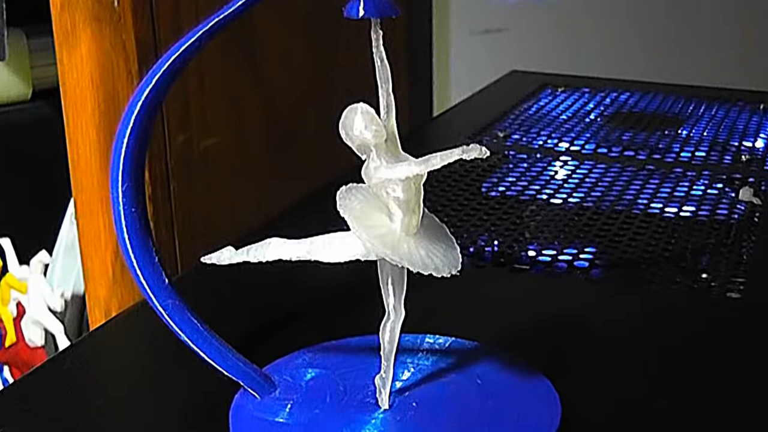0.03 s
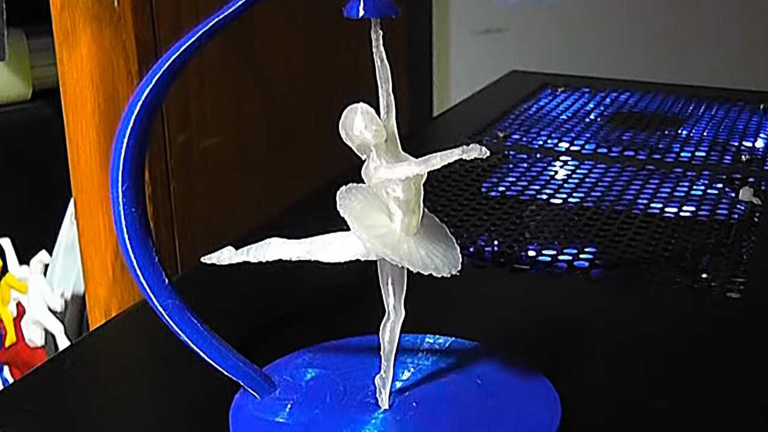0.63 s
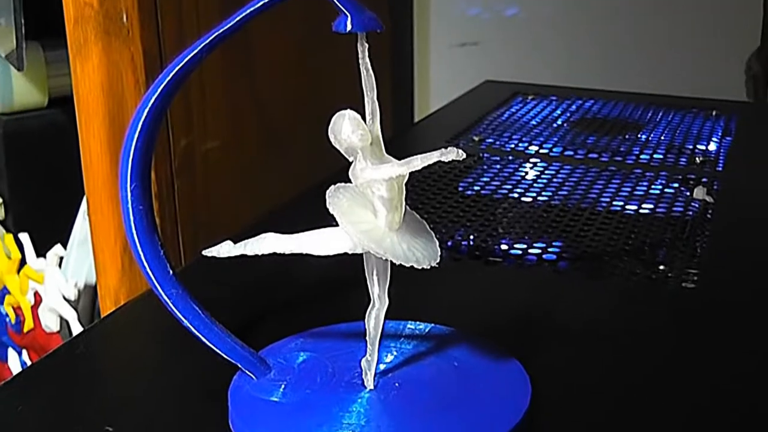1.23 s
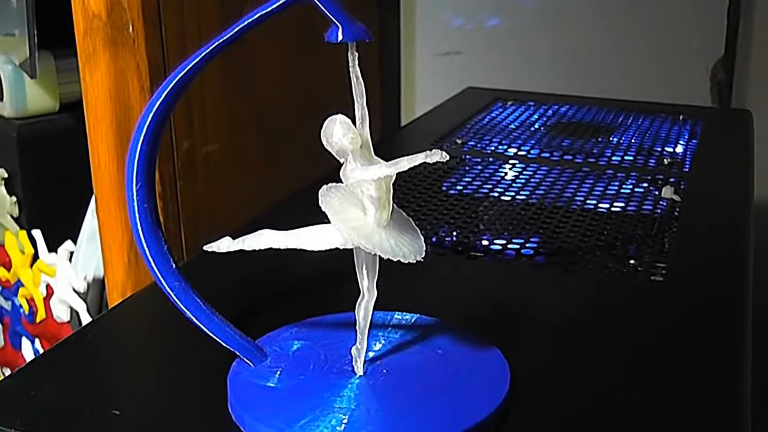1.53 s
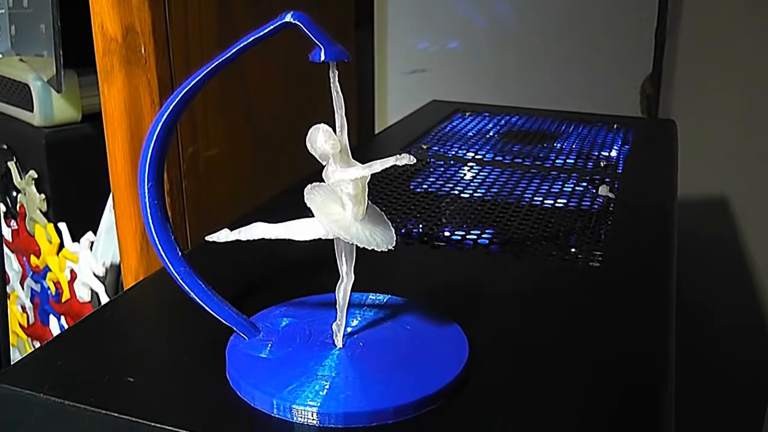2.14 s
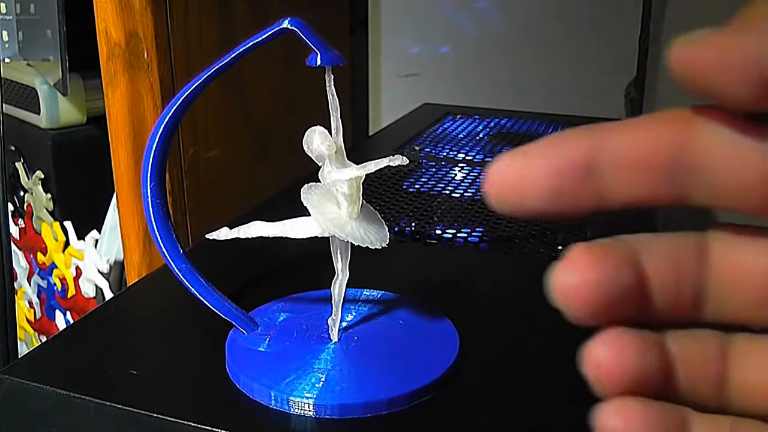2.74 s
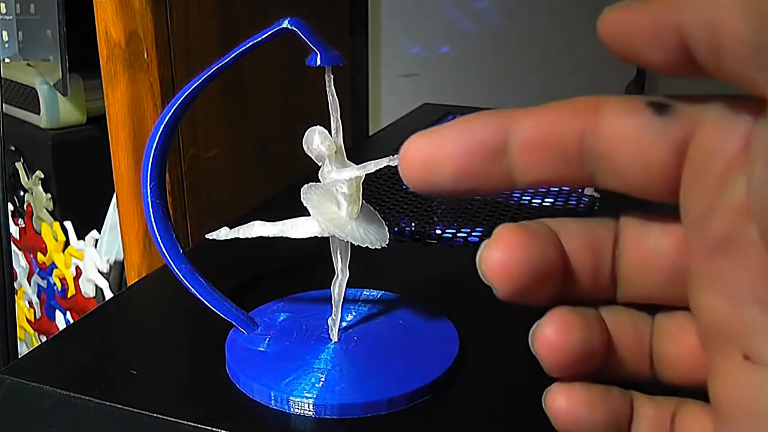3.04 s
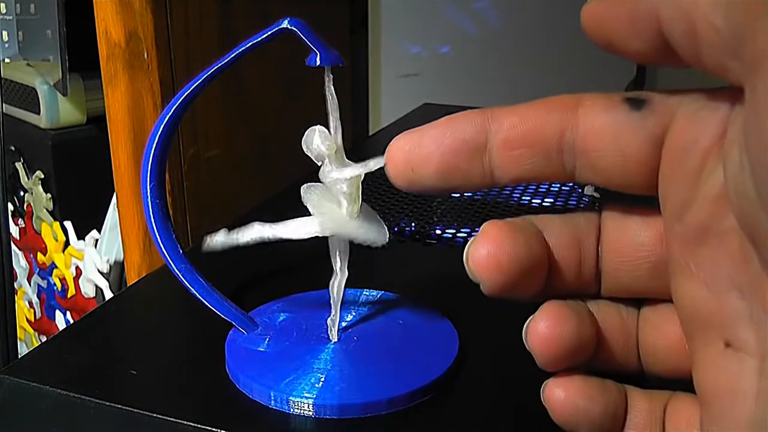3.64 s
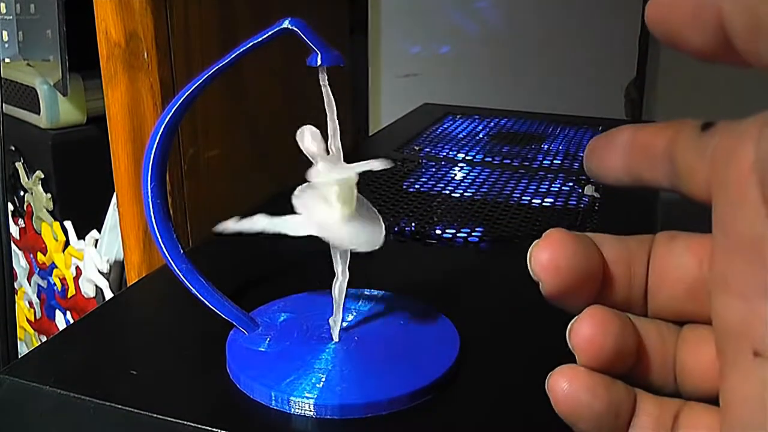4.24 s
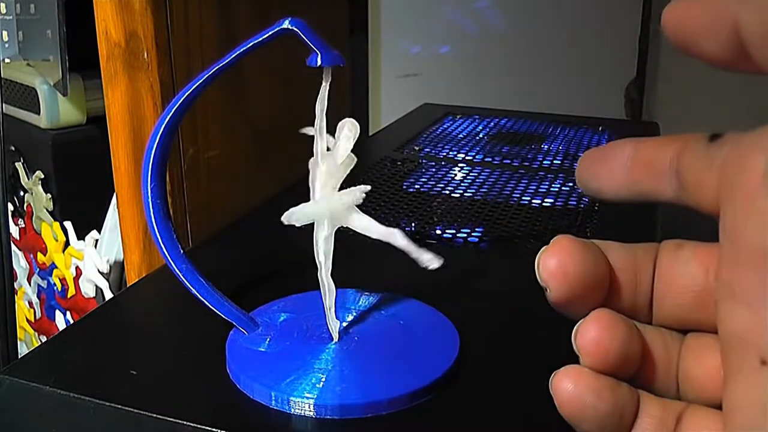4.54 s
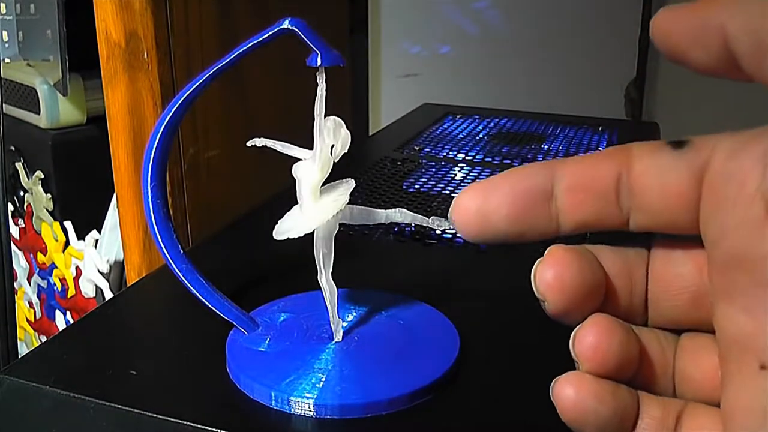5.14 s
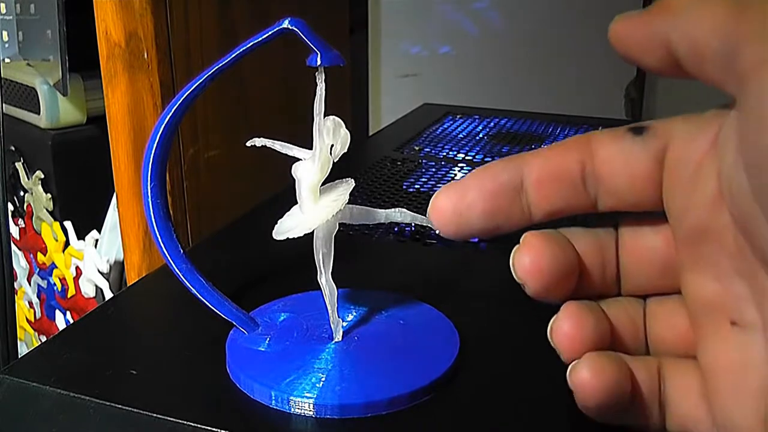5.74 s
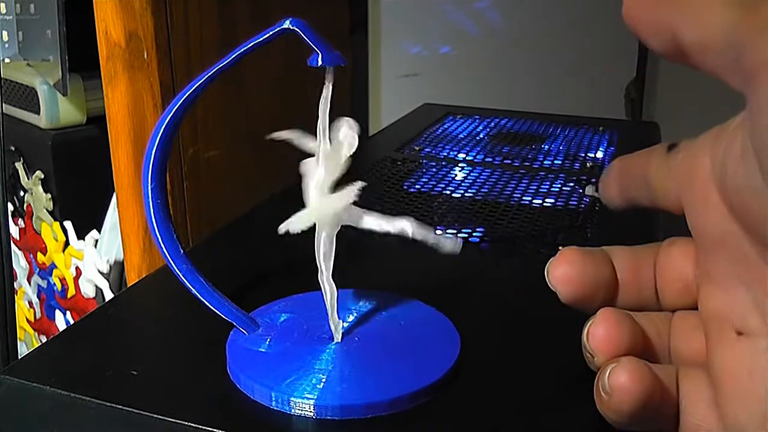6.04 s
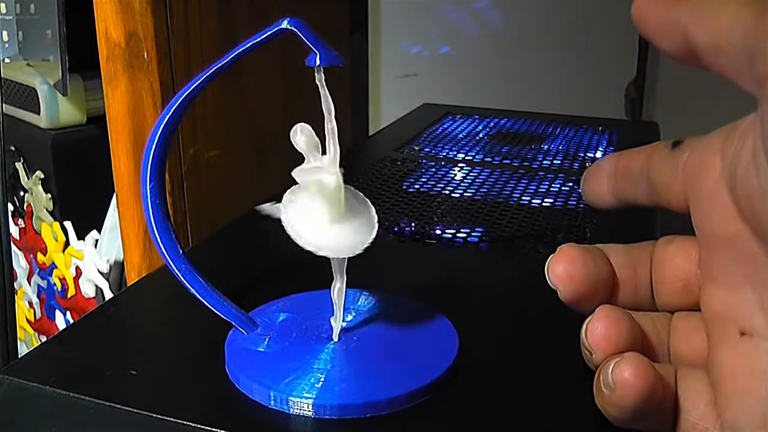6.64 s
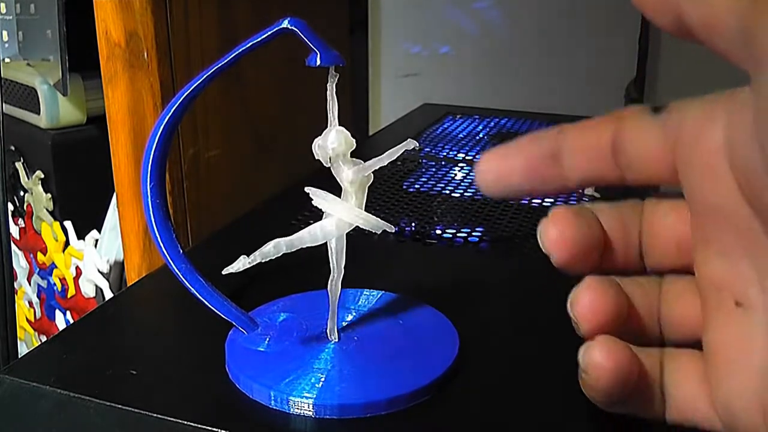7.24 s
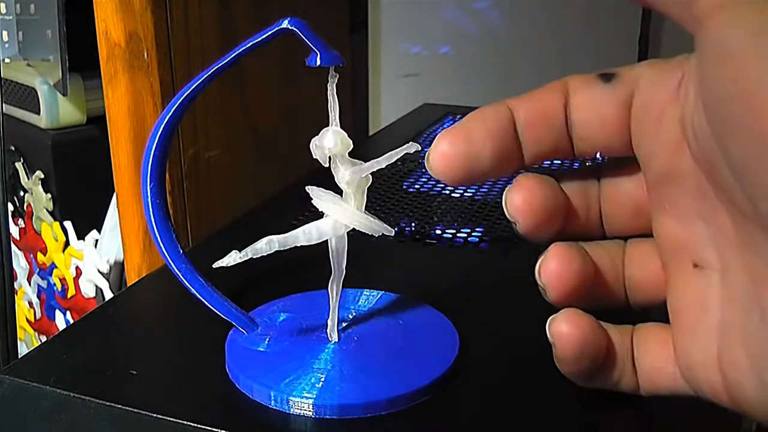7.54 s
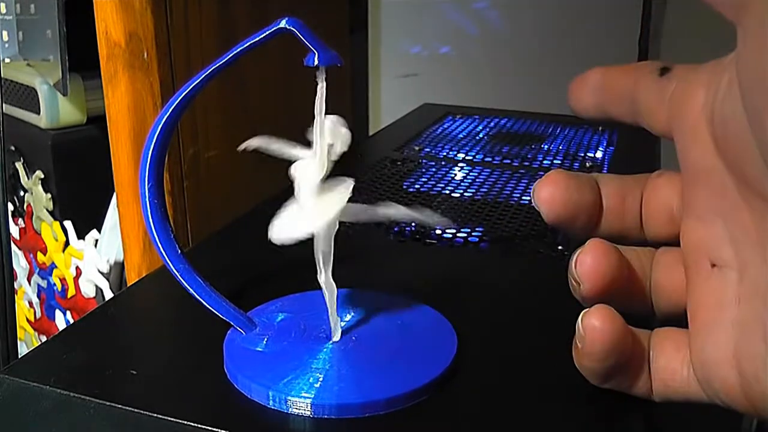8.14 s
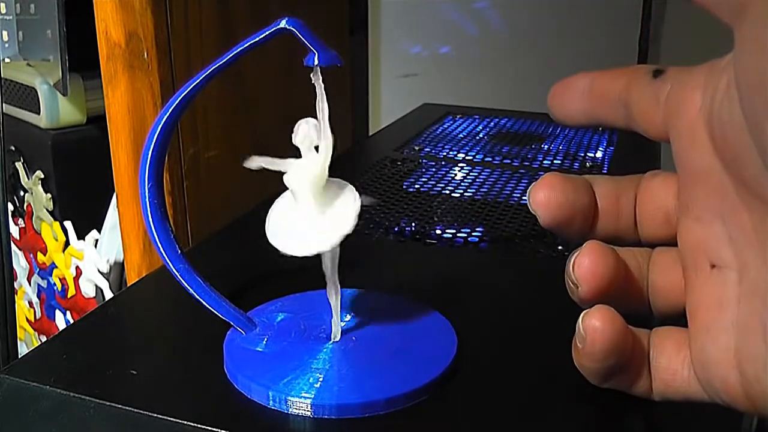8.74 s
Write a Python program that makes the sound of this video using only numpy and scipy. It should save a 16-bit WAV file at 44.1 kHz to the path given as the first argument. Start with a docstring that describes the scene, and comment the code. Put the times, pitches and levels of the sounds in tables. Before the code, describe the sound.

In a quiet room, a fan hums with a faint electronic whine, and a small tick sounds. A finger flicks a little plastic figure on a desk three times, close to the microphone. Each flick brings sharp clicks and light knocks, then a rattle and soft rolling rumble that fade as it spins down. The last flick is the strongest. A vehicle drones past outside around the first spin.

```python
"""Plastic dancer spinning on a desk

Close camera microphone in a quiet room. A small plastic dancer, loose between two pivots, is flicked
round three times by a finger. Its tips chatter in their sockets: sharp clicks ring the figure and knock
its base, and the rolling tips rumble on as it spins down. Soft rumble and rustle swell close by. Further
off are two small ticks, a fan, a faint electronic whine and the drone of a vehicle passing outside."""
import sys
import numpy as np
from scipy import signal
from scipy.fft import rfft, irfft
from scipy.io import wavfile
from scipy.ndimage import uniform_filter1d

SR = 44100
rng = np.random.default_rng(int(sys.argv[2]) if len(sys.argv) > 2 else 0)


def store_pcm(level_fs):
    """Save levels as 16-bit WAV."""
    pcm = np.round(np.clip(level_fs, -1, 1) * 32767).astype(np.int16)
    wavfile.write(sys.argv[1], SR, np.atleast_2d(pcm).T)


N = 396900
T = np.arange(N) / SR

# The clearest knocks of a tip in its socket. Each row: start in seconds, relative level in dB,
# top band over the 7 kHz ring in dB, bounce delay in seconds (3 ms or less gives no bounce).
TIP_KNOCKS = [(3.7355, -36, 1, 0.0047), (3.762, -24.5, 2, 0), (3.77, -36, -6, 0), (3.7989, -32, -2, .007),
              (3.8794, -43, -3, 0), (3.8972, -40, 4, .012), (4.0636, -54, -4, .008),
              (4.2261, -48.5, 1, 0.0074), (4.2613, -49, -10, 0), (5.8978, -21, 8.5, 0.011),
              (5.9013, -32.5, -5, .005), (5.9602, -27, 0, 0.0016), (6.0203, -42, -8, 0.0014),
              (6.182, -43.5, 1, 0.012), (6.4156, -47, -8, .013), (6.5856, -52, 3, 0.011),
              (6.621, -51, -5, 0.00043), (7.8271, -26.5, -10, 0.0077), (7.8387, -22, 13, 0.0074),
              (7.8408, -19.5, -9, 0), (7.8616, -31, 4, 0.0091), (7.8928, -39, -5, 0.0082),
              (7.9056, -34, -6, .005), (7.9151, -24.5, 6, .0154), (7.9224, -35, -3, 0),
              (7.9828, -36.5, -1, 0), (8.0659, -44.5, -8, 0.001), (8.1049, -35.5, 2, 0),
              (8.2474, -43, -5, 0.0049), (8.285, -42.5, -8, 0.00036), (8.3733, -45, -1, 0.00071),
              (8.4843, -45, -3, 0.011), (8.6037, -44, -7, 0), (8.8134, -47, -7, 0.011)]
# Modes of the figure and its arch. Each row: frequency in Hz, relative level in dB, t60 in seconds.
FIGURE_MODES = [(2193, -6, 0.12), (2767, -2.5, 0.048), (3025, -6.5, 0.063), (3330, -2, 0.038),
                (3575, -5, 0.045), (4510, -8, 0.038), (5520, -14.5, 0.031), (5750, -17, .025),
                (6280, 0, 0.018), (6700, 0.5, 0.023), (7160, -5.5, 0.042), (7690, -0.5, 0.044),
                (8060, -3, 0.032), (8370, -2, 0.031), (9650, -7.5, 0.041), (9740, -8, .035),
                (9920, 3.5, 0.03), (10660, 8.5, 0.0084), (12000, -7, 0.022), (15000, -15, .02),
                (15200, -10, .025)]
# Modes of the base on the desk. Each row: frequency in Hz, relative level in dB, t60 in seconds.
BASE_MODES = [(185, -8, 0.068), (237, -4, 0.11), (311, -1, 0.089), (360, -6, 0.027), (433, -1.5, 0.063),
              (512.5, 2, 0.15), (610, -1, 0.062), (656, -2.5, 0.063), (794, -6, 0.047), (1000, -10, 0.029),
              (1273, -10, .035)]
# Heavy blows that reach the desk. Each row: start in seconds, relative level in dB.
THUMPS = [(3.763, -35), (3.834, -35), (5.945, -35), (7.828, -27), (7.842, -29.5), (7.891, -28.5),
          (7.93, -29.5)]
# One spin per flick. Each row: start and time to rest in seconds, relative roll and rattle levels in dB.
SPINS = [(3.741, 1.1, -36.5, -51), (5.895, 1.11, -35.5, -48), (7.825, 1.6, -35, -38.5)]
# Resonances that the rolling tip excites. Each row: centre in Hz, width in Hz, boost in dB.
TIP_RESONANCES = [(2120, 70, 9), (3260, 1300, 12.5), (6400, 1100, 8), (8060, 400, 13.5), (10000, 420, 17),
                  (12500, 500, 11), (14200, 900, 6)]
# Small ticks in the room. Each row: start in seconds, level in dB, t60 in seconds.
TICKS = [(1.3875, -31.5, 0.021), (1.903, -50, .06)]
# Spectrum of a tick. Each row: frequency in Hz, relative level in dB.
TICK_SPECTRUM = [(600, -15), (1300, 11.5), (2200, -1.5), (4000, -3), (4900, -1), (6500, 2), (8000, -13),
                 (12000, -12), (16000, -20)]
# Soft swells near the microphone; the last is a faint, breathy swish.
# Each row: centre and half length in seconds, rumble and rustle levels in dB.
SOFT_SWELLS = [(1.66, 0.25, -59, -60.5), (2.63, 0.12, -48, -80), (4.1, 0.43, -53, -84),
               (5.4, 0.13, -58, -69), (5.871, 0.089, -51, -85), (7.551, 0.078, -64, -66)]
# Dull rumble through the walls and the camera's body. Each row: frequency in Hz, relative level in dB.
RUMBLE_SPECTRUM = [(12, -27), (30, -19), (60, 6), (80, -1), (140, -7.5), (500, -56)]
# Rush of room air and fan. Each row: frequency in Hz, relative level in dB.
AIR_SPECTRUM = [(15, -40), (25, -12.5), (99, -6), (153, -12.5), (242, -6.5), (309, -3.5), (373, -12),
                (659, -0.5), (840, -6.5), (1020, -6.5), (1740, -19), (2550, -25), (9320, -39),
                (14800, -43.5), (16000, -50)]
# Resonances of the fan's housing and the room. Each row: centre in Hz, width in Hz, gain in dB.
HOUSING_RESONANCES = [(160, 30, 1.5), (244, 73, 3), (400, 106, 3.5), (627, 43, 0), (870, 50, -1),
                      (1046, 81, -1.5), (1308, 40, -7), (1690, 320, 4), (2526, 39, -10.5)]
# Mains hum and fan tones. Each row: frequency in Hz, level in dB.
HUM_TONES = [(120, -57), (186, -63), (447, -59.5), (672, -59.5), (897, -56), (1024, -58)]
# Electronic whine on multiples of 500 Hz. Each row: frequency in Hz, level in dB.
WHINE_TONES = [(7000, -78), (7500, -83), (8000, -83), (8500, -85), (9000, -80), (11000, -83), (12000, -89),
               (13000, -84), (14000, -88), (15000, -86)]
# The engine pulling. Each row: start in seconds, end in seconds, gain in dB.
ENGINE_PULLS = [(2.582, 2.8, 4), (3.42, 4.503, 9.5), (4.9, 5.633, 6.5)]

MEDIUM_CLICK_DB = -34  # bounce and low ring get a smaller share above this level, a larger one below
MIC_OPENS_S, MIC_TOP_HZ = .839, 15750


def chatter(click_db=-3.0, knock_db=-13.5, knock_growth=0.6, thump_db=-1, soft_hz=520, pressed_t60=0.05):
    """Close to the microphone the pivots click; each click knocks the base, heavy blows thump it."""
    out = np.zeros(N)
    for s, db, top_db in [*contacts(), *rattle()]:
        low_db = -9.5 - 0.35 * (db - MEDIUM_CLICK_DB)  # a harder contact has less of the low ring
        add(out, s, undb(db + click_db) * click(top_db, low_db))
        knock = unit(ring(BASE_MODES, scatter_db=3.0, detune=0.035), size=441)
        add(out, s, undb(knock_db + knock_growth * (db - 20.5)) * knock)
    soften = signal.butter(1, soft_hz, fs=SR, output="sos")  # a longer push favours the low modes
    for s, db in THUMPS:
        thump = ring(BASE_MODES, scatter_db=5, detune=0.037)
        thump = signal.sosfilt(soften, thump * fade(pressed_t60))  # the pressed base damps quickly
        add(out, s, undb(db + thump_db) * unit(thump, size=441))
    bass_cut = signal.butter(2, 140, "high", fs=SR, output="sos")  # a small base radiates little bass
    return signal.sosfilt(bass_cut, out)


def contacts(bounce_db=-2, bounce_loss=0.12):
    """Each clear knock and any duller bounce, weaker after loud knocks but a little louder after the faintest,
    as (seconds, level dB, top band dB)."""
    for s, db, top_db, bounce_s in TIP_KNOCKS:
        yield s, db, top_db
        if bounce_s > .003:
            yield s + bounce_s, db + bounce_db - bounce_loss * (db - MEDIUM_CLICK_DB), top_db - 5.5


def rattle(count=24, bunching=2.0, spin_share=.55, fall_db=18.5, scatter_db=4.5, top_db=-4):
    """Loose knocks that thin out and fade after each flick, as (seconds, level dB, top band dB)."""
    for start, length, _, db in SPINS:
        progress = ((np.arange(count) + rng.random(count)) / count) ** bunching
        for p, (loud, bright) in zip(progress, rng.standard_normal((count, 2))):
            s = start + .008 + p * spin_share * length
            yield s, db - fall_db * p ** 0.55 + scatter_db * loud, top_db + 3 * bright


def click(top_db, low_db, crack_db=10, crack_t60=0.0094, tail_db=-6, tail_t60=0.095, rise_s=0.00008):
    """A hard contact cracks, then the figure rings; the contact point balances its registers."""
    grit_envelope = undb(crack_db) * fade(crack_t60) + undb(tail_db) * fade(tail_t60)
    grit = rng.standard_normal(8192) * grit_envelope
    attack = 1 - np.exp(-T[:8192] / rise_s)
    sound = (ring(FIGURE_MODES, scatter_db=5.5, detune=0.0032) + grit) * attack
    lag = rng.integers(8, 30)
    sound = sound + 0.49 * np.pad(sound, (lag, 0))[:8192]  # an instant rebound makes the click hollow
    registers_hz = [(1800, 4070), (5250, 9800), (9300, 13200), (13300, 14800)]
    low, mid, top, gloss = (unit(band(sound, lo, hi), size=176) for lo, hi in registers_hz)
    return unit(mid + undb(top_db) * top, size=176) + undb(low_db - 1) * low + undb(-12) * gloss


def ring(modes, scatter_db, detune):
    """One blow: each mode answers with a strength and sign that depend on where it lands."""
    out = np.zeros(8192)
    for (hz, db, t60), (sign, loud, sharp) in zip(modes, rng.standard_normal((len(modes), 3))):
        wave = np.sin(2 * np.pi * hz * (1 + detune * sharp) * T[:8192])
        out += np.sign(sign) * undb(db + scatter_db * loud) * fade(t60) * wave
    return out


def rolling(rumble_db=-2, scrape_db=-19.0, ridges_per_s=220, spread_db=3.5, speed_power=1.71):
    """The tip bumps over tiny ridges in the socket: the base rumbles and the figure rustles."""
    force = sum(undb(db) * spin_speed(start, length) ** speed_power for start, length, db, _ in SPINS)
    ridges = (rng.random(N) < ridges_per_s / SR) * rng.choice([-1, 1], N)
    ridges = ridges * undb(spread_db * np.minimum(rng.exponential(size=N), 3))
    base_ring = ring(BASE_MODES, scatter_db=-0.5, detune=0)
    rumble = unit(band(signal.fftconvolve(ridges, base_ring)[:N], 181, 1230))
    scrapes = signal.fftconvolve(np.abs(ridges), fade(0.025))[:N]  # each ridge scrapes for a few ms
    spectrum = [(300, -27), (1500, 10), (2600, -5), (4600, -9), (8000, -3), (11000, -17), (16000, -12)]
    rustle = unit(colour(rng.standard_normal(N) * scrapes, spectrum, TIP_RESONANCES))
    return force * (undb(rumble_db) * rumble + undb(scrape_db) * rustle)


def spin_speed(start, length, push_s=0.027):
    """Speed of one spin, 0-1: the finger's quick push, then steady braking by friction."""
    return np.clip((T - start) / push_s, 0, 1) * np.clip(1 - (T - start) / length, 0, 1)


def ticks(tail_db=-17, tail_t60=0.31):
    """Dry ticks with a short wash from the room."""
    out = np.zeros(N)
    for s, db, t60 in TICKS:
        envelope = fade(t60) + undb(tail_db) * fade(tail_t60)
        add(out, s, undb(db) * noise(TICK_SPECTRUM, size=8192) * envelope)
    return out


def soft_swells():
    """Soft swells of rumble and rustle near the microphone; the last is a faint, breathy swish."""
    rumble = noise(RUMBLE_SPECTRUM)
    rustle = noise([(800, -20), (3000, 2.5), (7000, -0.5), (12000, -5.5), (16000, -11)])
    rustle *= undb(2.3 * wander(41.3))
    return sum((undb(rumble_db) * rumble + undb(rustle_db) * rustle) * np.exp(-((T - s) / half) ** 2)
               for s, half, rumble_db, rustle_db in SOFT_SWELLS)


def fan(air_db=-40.45, waver_db=1.02, side_db=-12.0):
    """Room tone: air rushes through the fan's housing, nearly the same at both microphone ports."""
    mid, side = (noise(AIR_SPECTRUM, HOUSING_RESONANCES) for _ in range(2))
    mid = colour(mid, [(30, -1.5), (90, -5.5), (140, 0.5), (300, -0.5), (3000, 0), (4500, -2),
                       (9000, 2), (12000, -3), (16000, -3)])
    side = colour(side, [(60, -1.5), (150, 7), (500, -3), (1100, 2.5), (3200, -0.5), (5000, -15.5),
                         (8000, -52), (10500, -1.5), (13500, 5)])
    return undb(air_db + waver_db * wander(5.5)) * stereo(mid, undb(side_db) * side)


def hum_and_whine():
    """Behind the desk, mains hum and fan tones waver and a thin electronic whine flickers."""
    hum = sum(tone(hz * (1 + 0.001918 * wander(12)), db + 2 * wander(6)) for hz, db in HUM_TONES)
    whine = sum(tone(np.full(N, hz), db + 2.5 * wander(4)) for hz, db in WHINE_TONES)
    return hum + whine


def vehicle(engine_hz=100.7, coast_db=-52, throttle_s=0.094, rumble_db=-54, boom_db=-51.5,
            speed_m_s=28, road_m=24.8, nearest_s=3.07):
    """Outside, about 25 m off: an engine sinks in pitch as it passes and swells when it pulls."""
    along_m = speed_m_s * (T - nearest_s)
    distance_m = np.hypot(along_m, road_m)
    receding = along_m / distance_m
    doppler = 1 - speed_m_s / 343 * receding
    effort_db = sum(db * np.clip(np.minimum(T - start, end - T) / throttle_s + .5, 0, 1)
                    for start, end, db in ENGINE_PULLS)
    exhaust_db = 1.5 * receding  # louder from behind, softer from the front
    level_db = coast_db + effort_db + exhaust_db + 2 * wander(15)
    engine = tone(engine_hz * doppler * (1 + 0.01124 * wander(12)), level_db)
    road_rumble = noise(RUMBLE_SPECTRUM)
    boom = unit(band(rng.standard_normal(N), 250, 262))  # road noise excites a room resonance
    near = road_m / distance_m
    fall_off = near ** 0.79  # sound fades more slowly between the houses
    return (engine + undb(boom_db) * boom) * fall_off + undb(rumble_db) * road_rumble * near


def room(x, wet_db=-20, t60=0.41):
    """Short, soft reflections from the desk and walls, 3 ms behind the direct sound."""
    tail = colour(rng.standard_normal(16384), [(200, -25), (1500, 9), (5000, 15), (16000, -35)])
    tail *= fade(t60, size=16384) * (T[:16384] > .003)
    return x + undb(wet_db) * signal.fftconvolve(x, tail / np.linalg.norm(tail))[:N]


def mic_ports(x, scatter_t60=0.027):
    """Sound scatters round the desk and camera body and reaches the two ports a little differently."""
    scatter = rng.standard_normal(8192) * fade(scatter_t60)
    side = signal.fftconvolve(x, scatter / np.linalg.norm(scatter))[:N]
    side = colour(side, [(200, -24), (1200, -16), (3200, -14.5), (5000, -45), (8000, -46),
                         (10500, -15), (13500, -10), (16000, -9)])
    shifted = np.imag(signal.hilbert(x))  # the ports also differ in phase
    side += colour(shifted, [(300, -12), (700, -25), (3000, -26), (8000, -46), (11000, -18), (14000, -10)])
    return stereo(x, side)


def stereo(mid, side):
    """Mid and side to left and right."""
    return np.array([mid + side, mid - side])


def undb(db):
    """Decibels to gain."""
    return 10 ** (np.asarray(db) / 20)


def unit(x, size=None):
    """Scale to rms 1 over the first `size` samples (all by default)."""
    return x / np.sqrt(np.mean(x[..., :size] ** 2))


def add(track, s, sound):
    """Mix a sound in at time s."""
    i = int(s * SR)
    track[i:i + len(sound)] += sound[:N - i]


def colour(x, points, bumps=()):
    """Filter by a (Hz, dB) outline with optional (Hz, width Hz, dB) bumps."""
    f = np.maximum(np.fft.rfftfreq(x.shape[-1], 1 / SR), 1)
    hz, db = np.transpose(points)
    shape = np.interp(np.log(f), np.log(hz), db)
    for centre, width, bump_db in bumps:
        shape = shape + bump_db / (1 + (2 * (f - centre) / width) ** 2)
    return irfft(rfft(x) * undb(shape), x.shape[-1])


def noise(points, bumps=(), size=N):
    """Coloured noise at rms 1."""
    return unit(colour(rng.standard_normal(size), points, bumps))


def band(x, lo_hz, hi_hz):
    """Causal band-pass."""
    return signal.sosfilt(signal.butter(3, [lo_hz, hi_hz], "band", fs=SR, output="sos"), x)


def wander(rate_hz):
    """Smooth random drift with a spread near 1."""
    hold = int(SR / rate_hz)
    steps = np.repeat(rng.standard_normal(N // hold + 1), hold)
    return unit(uniform_filter1d(uniform_filter1d(steps, hold), hold)[:N])


def fade(t60, size=8192):
    """Exponential decay that loses 60 dB in t60 seconds."""
    return np.exp(-np.log(1000) * T[:size] / t60)


def tone(hz, db):
    """A sine of given rms level that follows a pitch curve."""
    return np.sqrt(2) * undb(db) * np.sin(2 * np.pi * (np.cumsum(hz) / SR + rng.random()))


def scene():
    """The figure close in front of the microphone, the room behind, the road outside."""
    close = room(chatter() + rolling() + ticks()) + soft_swells()
    return mic_ports(close) + fan() + hum_and_whine() + vehicle()


def record(dry):
    """The camera microphone opens after a moment and cuts the top; its ports differ a little in colour."""
    tilt = [(40, 1.4), (150, 0.68), (500, -0.86), (1200, -0.44), (4000, -0.2), (9000, 0.2)]
    left = colour(dry[0], tilt)
    right = colour(dry[1], [(hz, -db) for hz, db in tilt])
    top_cut = signal.ellip(10, .2, 80, MIC_TOP_HZ, fs=SR, output="sos")
    return signal.sosfilt(top_cut, np.array([left, right]) * (T >= MIC_OPENS_S))


dry = scene()
out = record(dry)
store_pcm(out)
```